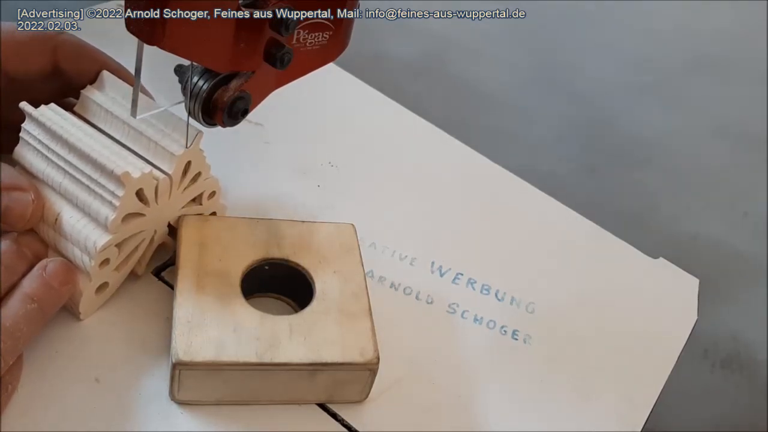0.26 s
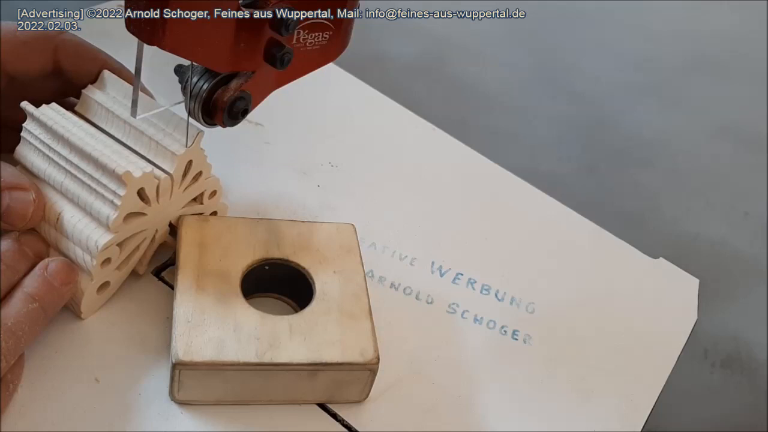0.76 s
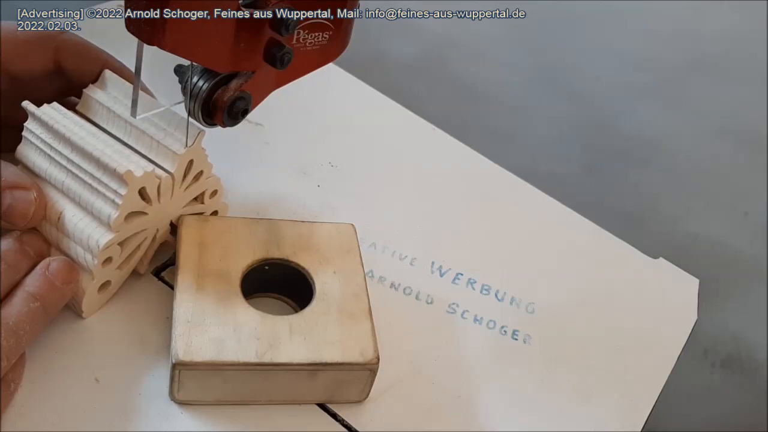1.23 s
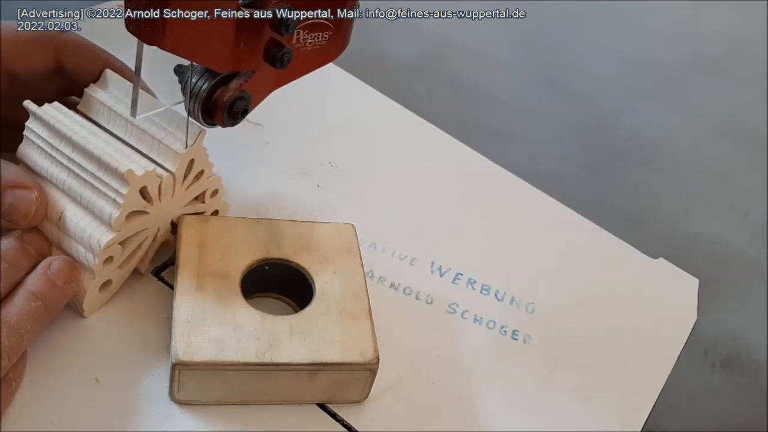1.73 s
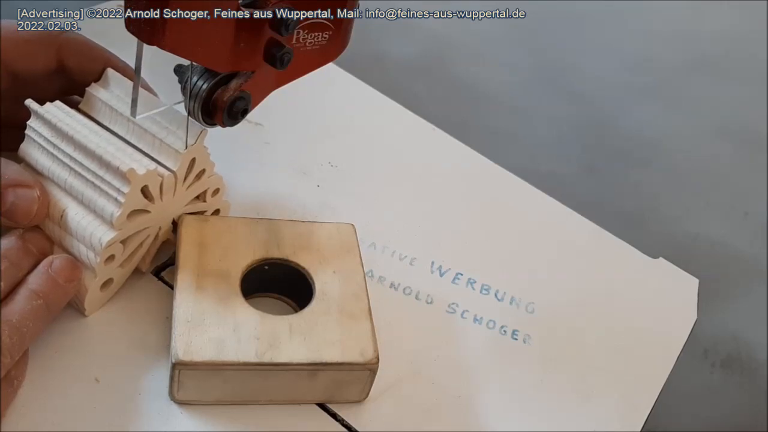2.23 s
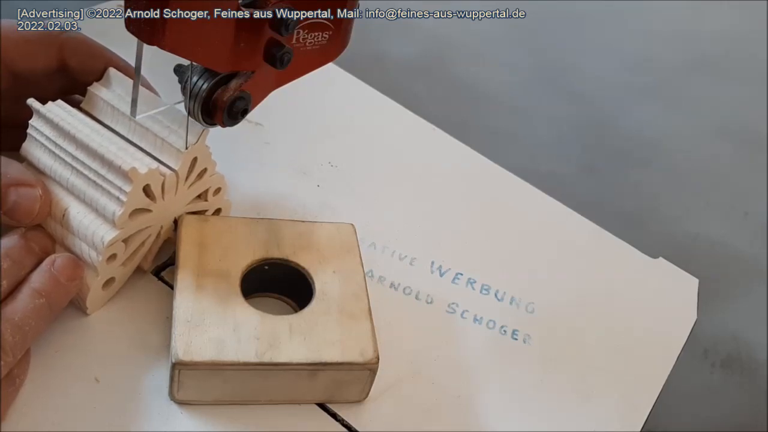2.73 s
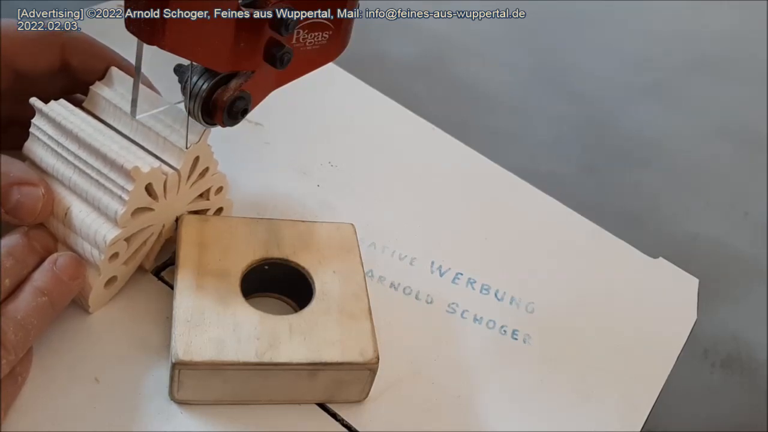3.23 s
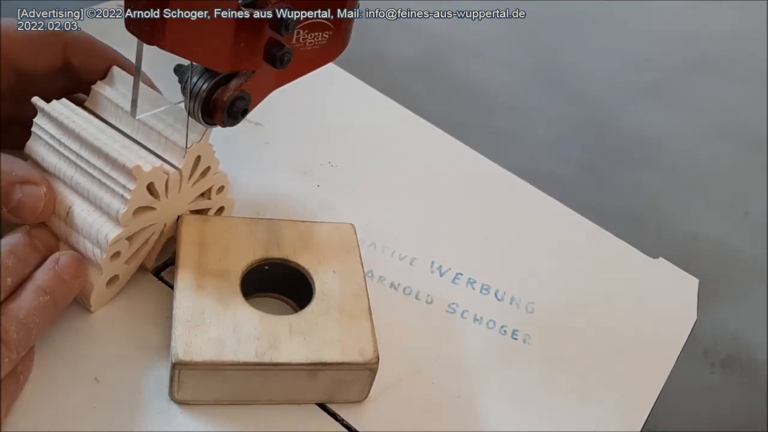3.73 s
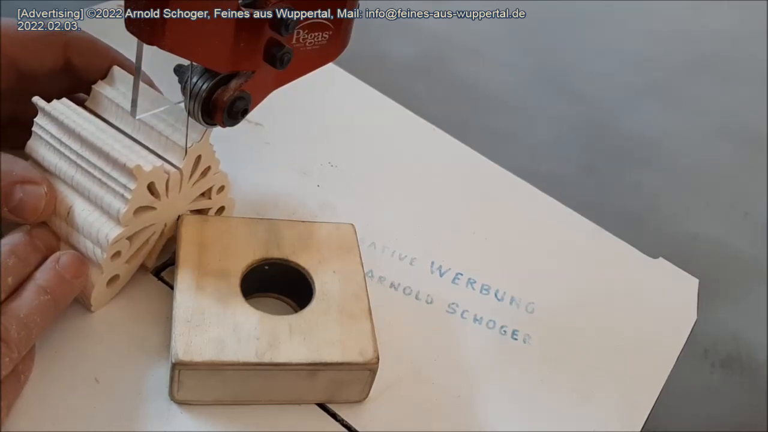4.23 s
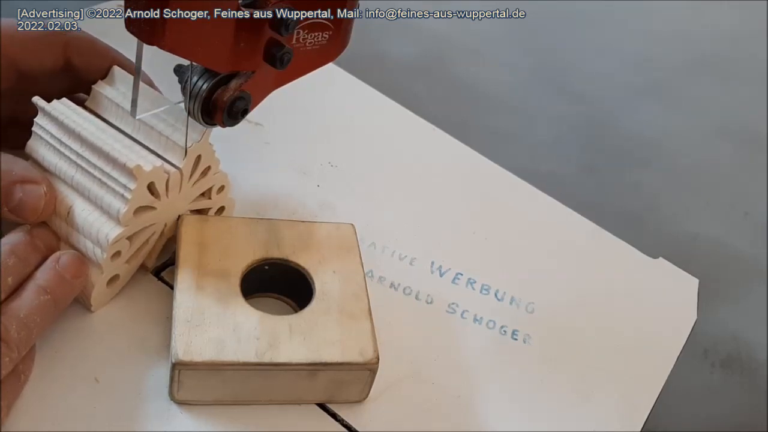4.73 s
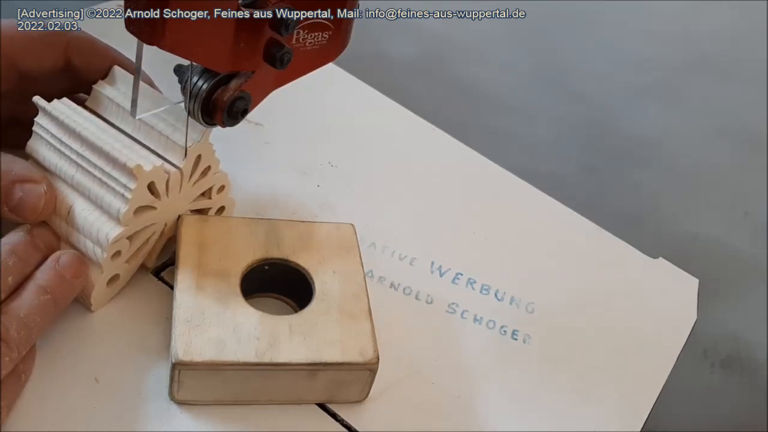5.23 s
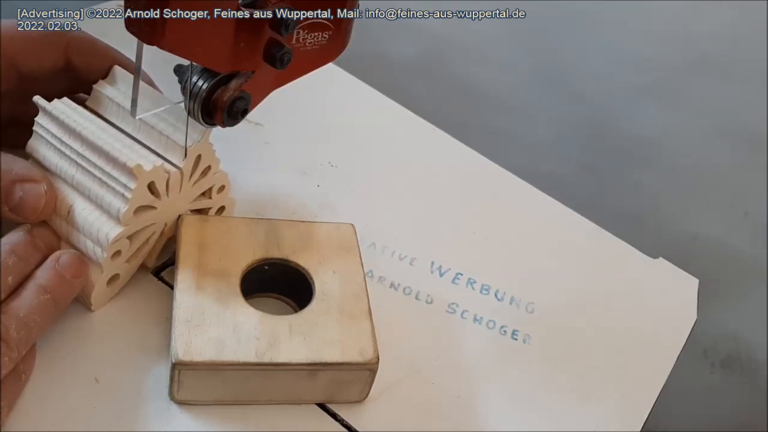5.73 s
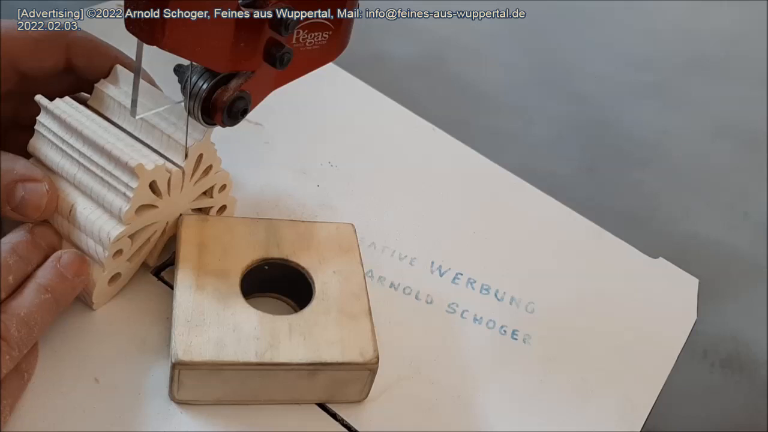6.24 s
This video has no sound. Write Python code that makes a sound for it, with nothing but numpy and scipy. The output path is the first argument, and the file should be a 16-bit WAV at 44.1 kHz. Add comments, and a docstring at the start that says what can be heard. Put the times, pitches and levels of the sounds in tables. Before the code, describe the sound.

A band saw rasps through a wooden block in quick ringing surges, eases to a softer rubbing, then catches with tiny squeaks.

```python
"""Quick ringing, rasping surges: a narrow band saw bites a thin piece off a fretted wooden block,
close to a stereo microphone in a workshop. The teeth pluck the blade, tear fibres and spray dust;
the block rattles and knocks on the table, air puffs at the microphone, the drive hums. After 4 s the
feed eases and the blade mostly rubs in the kerf, until the teeth catch once more and the blade squeaks."""
import sys
import numpy as np
from scipy import signal
from scipy.fft import rfft, irfft, next_fast_len
from scipy.io import wavfile
from scipy.ndimage import uniform_filter1d

SR = 44100
rng = np.random.default_rng(int(sys.argv[2]) if len(sys.argv) > 2 else 0)


def pcm_store(signal):
    """Save signal as 16-bit PCM."""
    levels = np.round(np.clip(np.atleast_2d(signal), -1, 1) * 32767)
    wavfile.write(sys.argv[1], SR, levels.astype(np.int16).T)


N = 285761

# feed, as base level of the cut (time [s], level [dB])
FEED = [(0.06, -21), (0.4, -21), (0.6, -22), (1.0, -20.5), (1.7, -21), (2.48, -20), (3.44, -19),
        (3.98, -20.5), (4.27, -25), (4.75, -27.5), (5.44, -24), (6.23, -21.5)]
# teeth digging in (time [s], ring drive [dB], chip drive [dB], lean to higher blade modes [Hz])
BITES = [(0.035, 5, 6, -20), (0.092, 2.5, -3, -40), (0.167, 0.5, 4, 20), (0.241, 5, 6.5, -20),
         (0.347, 6.5, -2, -60), (0.412, 2.5, -0.5, 30), (0.491, 6.0, -6, -70), (0.551, 2.5, -3, 20),
         (0.643, 5.5, 7, -20), (0.709, 6.5, 7.5, -90), (0.887, 5, 5.5, -10), (0.929, 8, 3.5, -60),
         (1.023, 5, 5, -20), (1.069, 3, -1, 0), (1.119, 6.5, 7, -70), (1.221, 7.5, 6.5, -60),
         (1.307, 2, 1, -40), (1.388, 7.5, -2, 30), (1.423, 2, 2.5, -30), (1.459, 6.5, 4.5, 20),
         (1.589, 5.5, 2, -70), (1.722, 3, 3, -10), (1.789, 4, 4, -20), (1.858, 10, 6, -100),
         (1.944, 3.5, -4, 0), (2.04, 6.5, 5, 30), (2.105, 7, 6.5, -30), (2.16, 6.0, 2, 40),
         (2.241, 8.5, 4.5, 50), (2.343, 5, -1.5, -10), (2.45, 5.5, 4, 40), (2.544, 7, 4, 20),
         (2.635, 5, 3, 40), (2.716, 4.5, 2.5, 30), (2.784, 4, 5, -10), (2.826, 6.0, 5, 10),
         (2.95, 8.5, 3.6, 0), (2.992, 5, -1, 20), (3.075, 8.5, 2.5, -20), (3.158, 5.5, 4, 20),
         (3.217, 5.5, 6, 70), (3.291, 6.5, 0, 10), (3.335, 3, -0.5, 40), (3.422, 3, 0, 30),
         (3.462, 7, 3.5, 0), (3.572, 7.0, 1, -30), (3.64, 3.5, 0, -30), (3.734, 5, -4, 30),
         (3.793, 3.5, 5, 0), (3.871, 7, 1.5, 10), (3.996, 5.5, -3, -20), (4.129, 0, 1, -50),
         (4.21, 5.5, -1, -50), (4.39, 2, 0, 40), (5.48, 4.0, 5.5, -48)]
# kerf contact (time [s], share of cutting against rubbing [0-1], narrowness [0-1])
CONTACT = [(0, 0.75, 0.02), (2.6, 0.84, 0.08), (3.2, 0.9, 0.46), (3.7, 0.97, 1), (4.1, 0.8, 1),
           (4.5, 0.3, 0.55), (5.1, 0.12, 0.6), (6.48, 0.22, 0.55)]
# blade bending modes (centre [Hz], width [Hz], gain [dB])
BLADE_MODES = [(3590, 85, 6), (3725, 105, 4), (3840, 100, -3.5), (3920, 670, -19)]
# ring drift under pressure (time [s], shift [Hz])
BLADE_SHIFT = [(0, -15), (1.8, -4.5), (2.3, 25), (3.3, 28.5), (4.0, -4.5), (4.6, -39.5), (6.48, -40)]
# higher blade modes (centre [Hz], width [Hz], gain [dB])
OVERTONE_MODES = [(4526, 70, 2.5), (4941, 60, 1.5), (5265, 110, 1), (5640, 120, 1), (6410, 60, 4),
                  (6941, 110, 0.5), (7198, 60, 1), (7430, 80, 0), (7773, 60, 2)]
# narrow-kerf resonances (centre [Hz], width [Hz], gain [dB])
KERF_MODES = [(7080, 750, 7.5), (11290, 200, 8), (4650, 1000, -10)]
# dust, tooth and block spectra, cutting and rubbing (frequency [Hz], gain [dB])
HISS_CUT_EQ = [(5470, -46), (9300, -15), (10400, -8), (11000, -4), (11800, -2), (12500, -4), (13300, -1),
               (14500, 0.5), (15300, 1), (15800, -2)]
HISS_RUB_EQ = [(5470, -41), (9300, -9), (9900, -4.5), (10600, -7), (11300, -6), (11900, -3.5), (12500, -6),
               (12950, -1), (13500, -4), (14100, -0.5), (14600, -1), (14900, -4), (15200, -3.5),
               (15700, -5), (15800, -14)]
RASP_CUT_EQ = [(2350, -52), (4000, 4), (4150, 2), (4330, 1), (4560, 3.5), (4880, -2), (5150, 1.5),
               (5620, 3), (5880, 0), (6250, 3.5), (6730, 7.5), (7550, 8), (7890, 7), (8100, -20),
               (10500, -11), (17800, -120)]
RASP_RUB_EQ = [(2350, -28), (4000, -13), (4350, -8), (4830, -9.5), (5200, -7.5), (5990, -5.5), (6350, -4),
               (6800, -9), (7300, -6), (7680, -10.5), (8100, -10.5), (10500, -65), (17800, -120)]
WOOD_CUT_EQ = [(380, -1.5), (650, -3), (800, -2.5), (1050, -3), (1380, -5.5), (1530, 1.5), (1700, -3.5),
               (1870, 2), (2020, 2), (2200, -1), (2400, -2), (2690, -8.5), (3020, -2), (3270, 2.5),
               (3420, -5.5), (4420, -53), (7480, -120)]
WOOD_RUB_EQ = [(380, -23), (650, -44), (800, 1.5), (1000, 0), (1330, 4), (1540, 2), (1700, 8), (1950, 9),
               (2210, -2), (2370, 3.5), (2650, 2.5), (2880, 9.5), (3100, 5), (3280, 10.5), (3450, 8),
               (4420, -36), (7480, -120)]
# rasp bands varied by the grain (centre [Hz])
GRAIN_BANDS_HZ = [4300, 4650, 5100, 5500, 5900, 6500, 7050, 7550]
# blade whistle (time [s], pitch [Hz], level [dB])
WHISTLE = [(0, 13600, -41), (1.3, 14380, -40), (1.8, 14450, -42), (2.2, 15220, -35), (2.7, 15250, -42),
           (3.25, 15430, -34), (3.55, 14870, -37), (4.05, 14500, -37), (4.4, 14130, -43),
           (4.85, 14230, -39), (5.25, 14200, -35), (5.7, 14290, -33), (6.1, 14240, -34), (6.48, 14300, -38)]
# block rattling on the table (time [s], base level [dB])
RATTLE = [(0.0, -40), (0.83, -36.5), (0.92, -40.5), (4.66, -40.5), (5.81, -35), (6.26, -34.5), (6.32, -45),
          (6.48, -36.5)]
# table rattle, table rumble, extra rumble filter with the block held down (frequency [Hz], gain [dB])
RATTLE_EQ = [(160, -12.5), (280, -12), (318, 7), (377, 0), (499, -0.5), (571, -5), (750, -10), (980, -22),
             (1650, -120)]
RUMBLE_EQ = [(25, -26), (50, -10), (75, -5), (110, -4), (170, 3), (235, -0.5), (300, 3.5)]
HELD_EQ = [(60, -22), (105, -5.5), (150, 0), (400, 1)]
# motor and bearing tones (frequency [Hz], level [dB])
DRIVE_TONES = [(199.6, -57.5), (312.2, -61), (2008, -47), (15269, -51)]
# strong air puffs (time [s], level [dB])
PUFFS = [(1.598, -37), (2.037, -36), (2.355, -38), (2.832, -41), (3.082, -36.5), (3.472, -46), (6.285, -31)]
# puff spectrum (frequency [Hz], gain [dB])
PUFF_EQ = [(22, -19), (55, -4), (80, 0.5), (130, -2), (200, -5), (450, -12)]
# block landing on the table (time [s], level [dB])
KNOCKS = [(0.645, -34), (0.802, -39), (1.012, -34), (1.217, -34), (1.340, -36), (1.832, -32), (2.030, -35),
          (2.340, -37), (2.508, -32), (2.833, -32), (3.078, -28.5), (3.307, -36), (3.460, -37),
          (3.489, -34), (6.249, -30.5), (6.283, -34)]
# knock spectrum (frequency [Hz], gain [dB])
KNOCK_EQ = [(60, -12), (180, -8), (250, -8), (315, 1), (420, 2), (540, 4), (680, -7), (1000, -22)]
# blade squeaks (time [s], Gaussian sigma [s], pitch [Hz], level [dB])
SQUEAKS = [(1.306, 0.0031, 3610, -18), (1.868, 0.0025, 3590, -23), (2.02, 0.0025, 11200, -18),
           (2.341, 0.0016, 3670, -16.5), (3.262, 0.003, 7000, -28), (6.25, 0.0055, 3650, -27),
           (6.302, 0.0037, 5200, -24), (6.326, 0.0037, 3600, -19.5), (6.411, 0.0054, 5380, -22),
           (6.425, 0.0033, 5260, -20.5)]

ROLLER_HZ, WHEEL_HZ = 70.6, 14.12  # turn rates: guide roller, band wheels
PORT_LAG_S = .00022  # right microphone port behind left
T = np.arange(N) / SR


def undb(db):
    """Decibels to gain."""
    return 10 ** (np.asarray(db) / 20)


def unit(x):
    """Scale to rms 1."""
    return x / np.sqrt(np.mean(x ** 2))


def steady(x, settle_s):
    """Hold rms at 1; only flutter faster than settle_s remains."""
    window = signal.windows.hann(int(2 * settle_s * SR))
    power = signal.fftconvolve(np.mean(x ** 2, axis=0), window / window.sum(), mode="same")
    return x / np.sqrt(power + 1e-9)


def curves(table):
    """Table columns, linearly interpolated over time."""
    times_s, *columns = np.transpose(table)
    return [np.interp(T, times_s, column) for column in columns]


def walk(rate_hz):
    """Slewed random steps, rms 1."""
    hold = max(int(SR / rate_hz), 1)
    return unit(uniform_filter1d(rng.standard_normal(N)[np.arange(N) // hold], hold))


def swells(times_s, heights, sigma_s):
    """A Gaussian swell at each time."""
    kicks = np.bincount(np.clip(times_s * SR, 0, N - 1).astype(int), heights, N)
    return signal.fftconvolve(kicks, signal.windows.gaussian(SR // 2, sigma_s * SR), mode="same")


def colour(x, eq):
    """Filter by (Hz, dB) points; 90 dB/octave roll-off outside them."""
    hz, db = np.transpose(eq)
    size = next_fast_len(N)
    octave = np.log2(np.maximum(np.arange(size // 2 + 1) * SR / size, 1))
    outside = np.maximum(np.log2(hz[0]) - octave, 0) + np.maximum(octave - np.log2(hz[-1]), 0)
    gain = undb(np.interp(octave, np.log2(hz), db) - 90 * outside)
    return irfft(rfft(x, size) * gain, size)[..., :N]


def resonate(x, hz, width_hz):
    """One resonance, unity peak gain."""
    return signal.lfilter(*signal.iirpeak(hz, hz / width_hz, fs=SR), x)


def bend(x, shift_hz):
    """Time-varying frequency shift."""
    analytic = signal.hilbert(x, next_fast_len(N))[..., :N]
    return np.real(analytic * np.exp(2j * np.pi * np.cumsum(shift_hz) / SR))


def pan(left_db):
    """Stereo gains for a left-minus-right level."""
    return undb(np.array([[left_db], [-left_db]]) / 2)


def workshop(paths, room_db):
    """Three paths to stereo: 0 is direct, left port first; 1 and 2 are scattered, one per port."""
    direct = np.array([paths[0], np.roll(paths[0], round(PORT_LAG_S * SR))])
    return unit(direct + undb(room_db) * paths[1:])


def clicks(rate_hz, scatter_db):
    """Tiny uneven impulses of tearing fibres or contacts, one row per path."""
    chance = rng.uniform(-1, 1, (3, N))
    size = undb(scatter_db * np.clip(rng.standard_normal((3, N)), -2, 2))
    return unit((np.abs(chance) < rate_hz / SR) * np.sign(chance) * size)


def contact_db(cutting, cut_db, rub_db):
    """Blend of cutting and rubbing levels."""
    return cutting * cut_db + (1 - cutting) * rub_db


def surge_db(bite_s, rises_db):
    """Each bite adds a swell of vibration to the steady cut."""
    return 20 * np.log10(1 + swells(bite_s, np.maximum(undb(rises_db) - 1, 0), sigma_s=.011))


def blade_ring(throb, lean_hz, centre_hz=3700, spread_hz=130):
    """Teeth pluck close blade modes, higher or lower from bite to bite; the wood steadies the swing."""
    chatter = throb * undb(2 * walk(320))
    ring = 0
    for hz, width_hz, db in BLADE_MODES:
        favour = np.exp(lean_hz * (hz - centre_hz) / spread_hz ** 2)
        plucks = chatter * clicks(rate_hz=4000, scatter_db=2.5)
        ring = ring + undb(db) * favour * resonate(plucks, hz, width_hz)
    ring = bend(ring, curves(BLADE_SHIFT)[0])
    ring = colour(ring, [(3300, -40), (3530, 11), (3900, 11), (4200, -8.5)])
    slip_rad = 1.3 * walk(60)
    stutter_db = 1.7 * np.sin(2 * np.pi * 2 * ROLLER_HZ * T + slip_rad)  # twice per roller turn
    return steady(workshop(ring, room_db=4) * undb(stutter_db), settle_s=.022)


def kerf(force, cutting, narrow, cut_eq, rub_eq):
    """Fibres tear while cutting, friction is smoother while rubbing; the narrow slot colours both."""
    tear = unit(colour(force * clicks(rate_hz=9000, scatter_db=2.5), cut_eq))
    rub = unit(colour(np.sqrt(force) * clicks(rate_hz=18000, scatter_db=0), rub_eq))
    wide = np.sqrt(cutting) * tear + np.sqrt(1 - cutting) * rub
    resonances = sum((undb(db) - 1) * resonate(wide, hz, width_hz) for hz, width_hz, db in KERF_MODES)
    return (1 - narrow) * wide + narrow * unit(wide + resonances)


def dust_hiss(force, cutting, narrow):
    """Dust sprays from the kerf: diffuse treble."""
    dust = kerf(force * undb(1.2 * walk(260)), cutting, narrow, HISS_CUT_EQ, HISS_RUB_EQ)
    return workshop(dust, room_db=30) * undb(contact_db(cutting, 2, -0.2))


def tooth_rasp(force, cutting, narrow, grain_db=1.6):
    """Teeth scrape the kerf; changing grain swells and fades each band separately."""
    teeth = kerf(force * undb(0.8 * walk(300)), cutting, narrow, RASP_CUT_EQ, RASP_RUB_EQ)
    grain = sum((undb(grain_db * walk(22)) - 1) * resonate(teeth, hz, width_hz=330)
                for hz in GRAIN_BANDS_HZ)
    return workshop(teeth + grain, room_db=5.5) * undb(contact_db(cutting, -0.8, -1.5)) * pan(1.4)


def high_mode(force, hz, width_hz):
    """One high blade mode, excited by tooth friction."""
    friction = force * clicks(rate_hz=9000, scatter_db=1)
    mode = resonate(resonate(friction, hz, width_hz), hz, width_hz)
    return workshop(mode, room_db=6)


def blade_chirp(throb, cutting, chip_db):
    """A chattering high mode flares with the bites."""
    chatter = throb * undb(4.5 * walk(280))
    return high_mode(chatter, hz=11330, width_hz=800) * cutting * undb(1.7 * chip_db - 9.5)


def blade_whistle(throb):
    """Thin sizzling mode; pitch rises with pressure on the blade."""
    pitch_hz, level_db = curves(WHISTLE)
    sizzle = high_mode(throb, pitch_hz.mean(), width_hz=240)
    return bend(sizzle, pitch_hz - pitch_hz.mean()) * undb(level_db)


def wood_body(throb, cutting, narrow):
    """The cut shakes the block: midrange noise."""
    block = kerf(throb * undb(2 * walk(140)), cutting, narrow, WOOD_CUT_EQ, WOOD_RUB_EQ)
    return workshop(block, room_db=8) * undb(contact_db(cutting, -14, -6.5)) * pan(1.8)


def overtones(noise, chatter_db=3.2):
    """Higher blade modes colour the cut noise in independent short bursts."""
    return noise + sum(resonate(noise * (undb(db + chatter_db * walk(130)) - 1), hz, width_hz)
                       for hz, width_hz, db in OVERTONE_MODES)


def reflections(x, echo_db, t60_s):
    """Short echoes off table and saw frame."""
    age_s = T[:SR // 8]
    tail = rng.standard_normal((2, len(age_s))) * undb(-60 * age_s / t60_s)
    tail = tail / np.sqrt(np.sum(tail ** 2, axis=1, keepdims=True))
    echo = signal.fftconvolve(x, tail, axes=1)[:, :N]
    return (x + undb(echo_db) * echo) / np.hypot(1, undb(echo_db))


def table_rattle(shake_db, cutting, full_hold_share=0.76):
    """The block rattles on the table; deep rumble opens up once the teeth stop holding it down."""
    held = np.minimum(cutting / full_hold_share, 1) ** 2
    jolts = undb(1.6 * walk(40))
    rattle = workshop(colour(jolts * clicks(rate_hz=1200, scatter_db=4.5), RATTLE_EQ), room_db=0.5)
    rattle = rattle * undb(contact_db(cutting, -3, 0.7) + 0.35 * shake_db) * pan(1.8)
    rumble = workshop(colour(jolts * clicks(rate_hz=590, scatter_db=1), RUMBLE_EQ), room_db=-3.5)
    rumble = (1 - held) * rumble + held * colour(rumble, HELD_EQ)
    rumble = rumble * undb(contact_db(held, -8.5, -2))
    return undb(curves(RATTLE)[0]) * (rattle + rumble)


def drive_hum(waver_hz=1.8, waver_db=2):
    """Motor and bearings hum and whine, wavering slightly."""
    tones = 0
    for hz, db in DRIVE_TONES:
        phase_rad = 2 * np.pi * np.cumsum(hz + waver_hz * walk(10)) / SR
        lag_rad = np.array([[0], [2 * np.pi * hz * PORT_LAG_S]])
        tones = tones + undb(db + waver_db * walk(9.6)) * np.sqrt(2) * np.sin(phase_rad - lag_rad)
    return tones


def air_puffs(bite_s, sigma_s=.015):
    """Air from the cut buffets mainly the right port: a faint puff per bite, a few strong ones."""
    strong_s, strong_db = np.transpose(PUFFS)
    faint_db = -54 + 10 * rng.uniform(-0.24, 1, len(bite_s))
    envelope = swells(strong_s, undb(strong_db), sigma_s) + swells(bite_s, undb(faint_db), sigma_s)
    air = unit(colour(rng.standard_normal((2, N)), PUFF_EQ))
    return air * envelope * undb([[-12], [1]])


def knocks(sigma_s=.005):
    """The block jumps and lands; a quick clatter of contacts thuds in the table."""
    knock_s, knock_db = np.transpose(KNOCKS)
    thud = workshop(colour(clicks(rate_hz=1500, scatter_db=5), KNOCK_EQ), room_db=-6.5)
    return steady(thud, 2 * sigma_s) * swells(knock_s, undb(knock_db), sigma_s) * pan(2)


def squeaks(jitter_hz=60):
    """The blade sticks for a few milliseconds and sings on one mode."""
    tones = 0
    for at_s, sigma_s, hz, db in SQUEAKS:
        envelope = np.exp(-.5 * np.minimum(((T - at_s) / sigma_s) ** 2, 100))
        phase_rad = 2 * np.pi * np.cumsum(hz + jitter_hz * walk(400)) / SR
        tones = tones + undb(db) * envelope * np.sin(phase_rad)
    return np.sqrt(2) * tones


def catch_db(release_s, at_s=6.238, attack_s=0.01, hold_s=0.05):
    """The teeth catch once more: quick rise, hold, exponential release."""
    age_s = T - at_s
    attack = np.clip(age_s / attack_s, 0, 1)
    release = np.exp(-np.maximum(age_s - attack_s - hold_s, 0) / release_s)
    return 6.5 * attack * release


def scene():
    """Feed and bites set the level of the cut; table, drive, air and squeaks add to it."""
    feed_db = curves(FEED)[0]
    cutting, narrow = np.clip(curves(CONTACT), 0, 1)
    bite_s, ring_rises_db, chip_rises_db, leans_hz = np.transpose(BITES)
    pluck_db, chip_db = surge_db(bite_s, ring_rises_db), surge_db(bite_s, chip_rises_db)
    snag_db = catch_db(release_s=0.04)
    band_db = feed_db + .55 * np.sin(2 * np.pi * WHEEL_HZ * T)
    shake_db = 0.5 * chip_db + 0.08 * pluck_db
    # the ring is damped by a narrow kerf and grows faster than the bite force
    ring_db = band_db + contact_db(cutting, -4.4, -6.8) - 1.5 * narrow + 1.22 * (pluck_db + snag_db)
    # the roller presses the blade in once per turn; the grain makes the force uneven
    throb = undb(1.15 * np.sin(2 * np.pi * ROLLER_HZ * T))
    force = throb * undb(walk(100) + 0.28 * walk(400))

    ring = blade_ring(throb, np.interp(T, bite_s, leans_hz)) * undb(ring_db) * pan(1)
    hiss = dust_hiss(force, cutting, narrow) * undb(band_db + 0.52 * chip_db + 0.85 * snag_db)
    rasp_db = band_db + 0.27 * chip_db + catch_db(release_s=0.115)
    rasp = tooth_rasp(force, cutting, narrow) * undb(rasp_db)
    chirp = blade_chirp(throb, cutting, chip_db) * undb(band_db)
    whistle = blade_whistle(throb)
    wood = wood_body(throb, cutting, narrow) * undb(feed_db + shake_db)
    cut = reflections(ring + chirp + whistle + overtones(hiss + rasp) + wood, echo_db=-7.5, t60_s=0.06)
    return cut + table_rattle(shake_db, cutting) + knocks() + drive_hum() + air_puffs(bite_s) + squeaks()


def record(dry):
    """Microphone: deep, wide treble notch and a steep low-pass."""
    for hz, width_hz in [(8500, 830), (8950, 790)]:
        dry = dry - resonate(dry, hz, width_hz)
    top_hz = 15690
    return signal.sosfilt(signal.ellip(12, .1, 80, top_hz, fs=SR, output="sos"), dry)


dry = scene()
out = record(dry)
pcm_store(out)
```